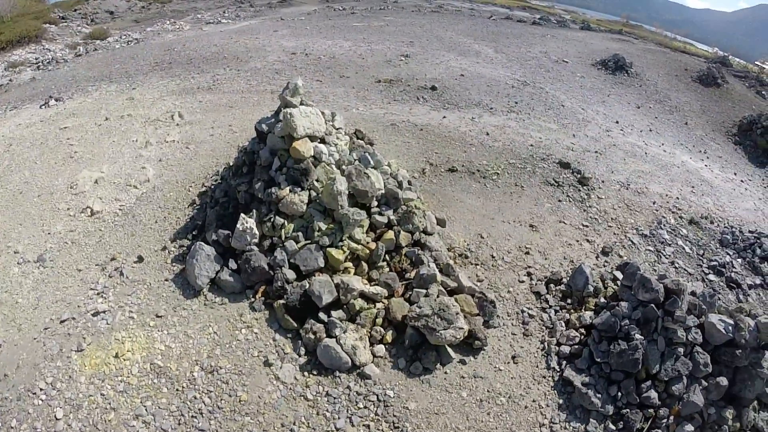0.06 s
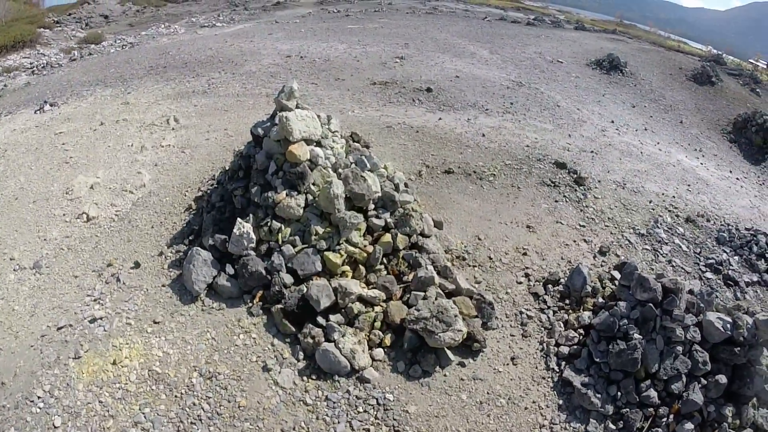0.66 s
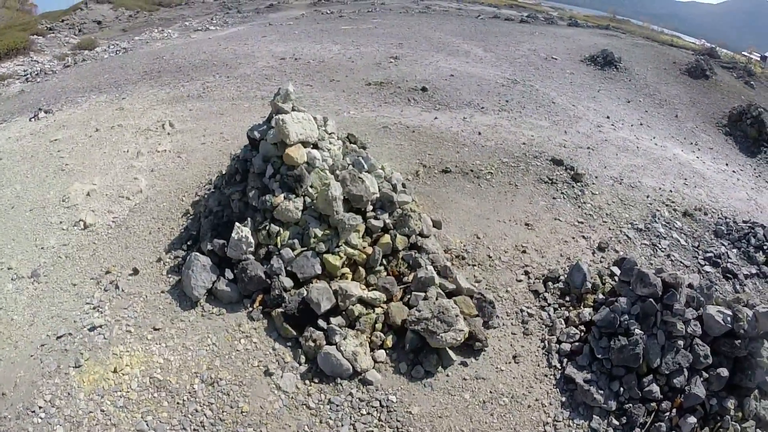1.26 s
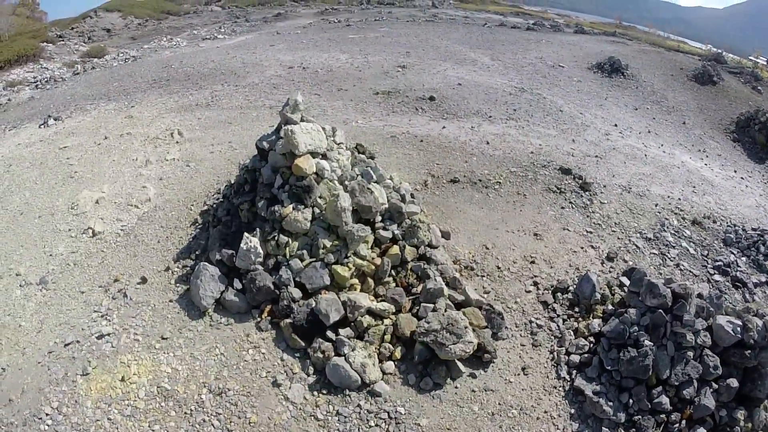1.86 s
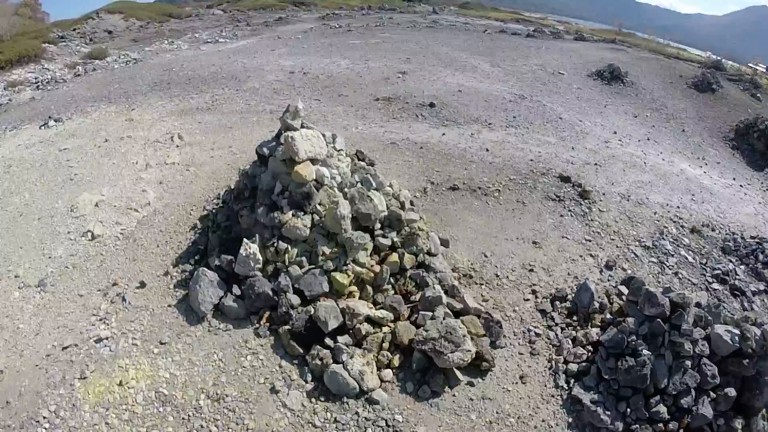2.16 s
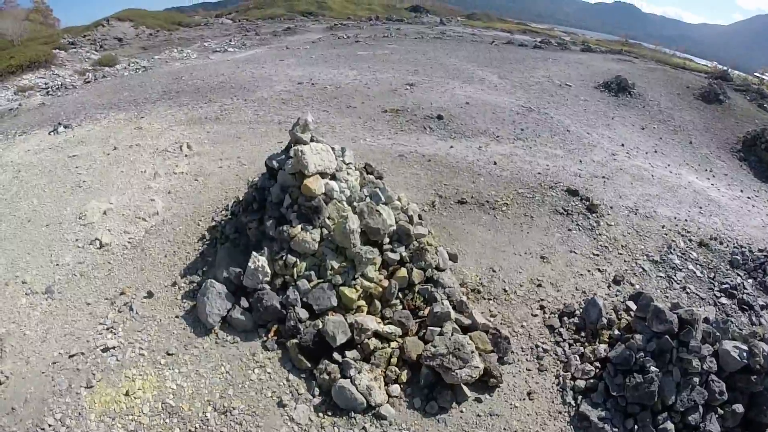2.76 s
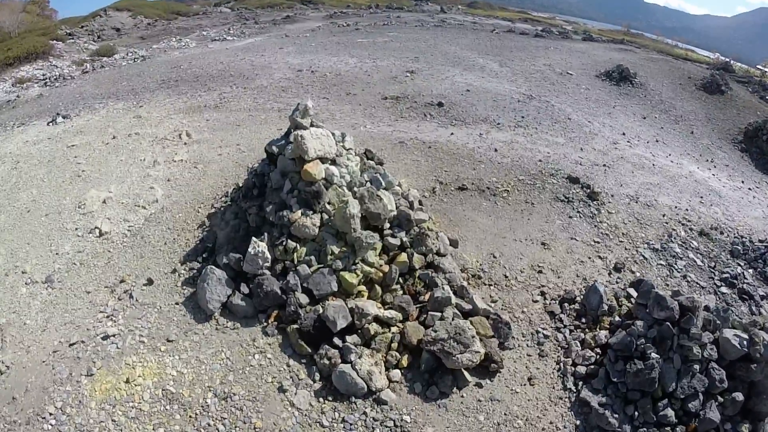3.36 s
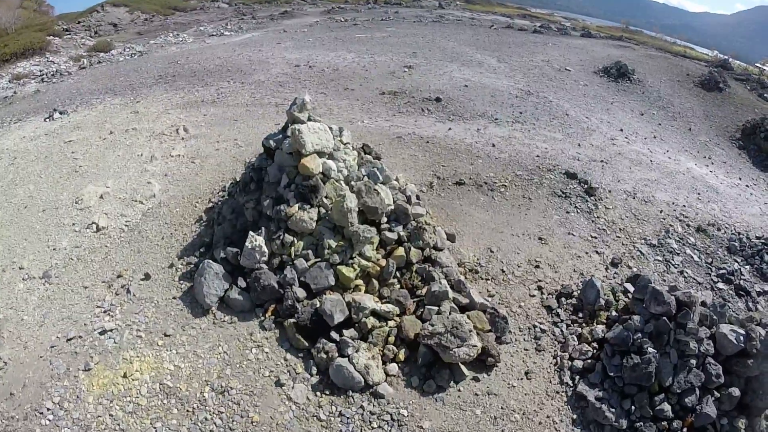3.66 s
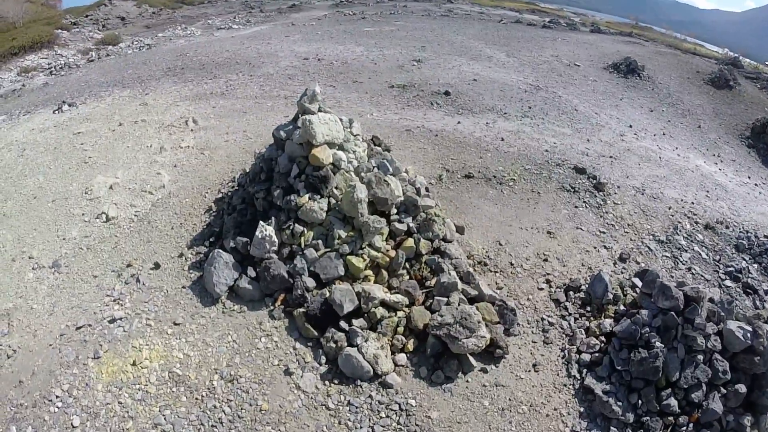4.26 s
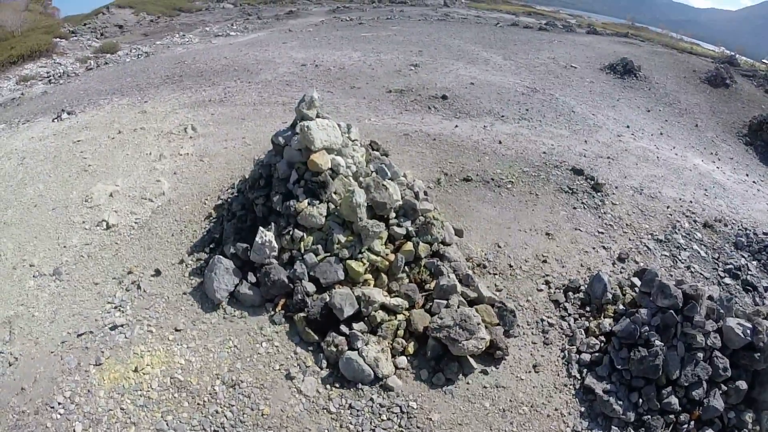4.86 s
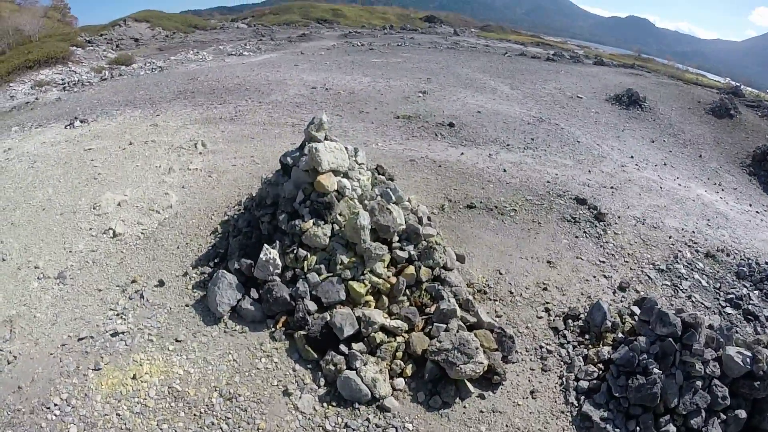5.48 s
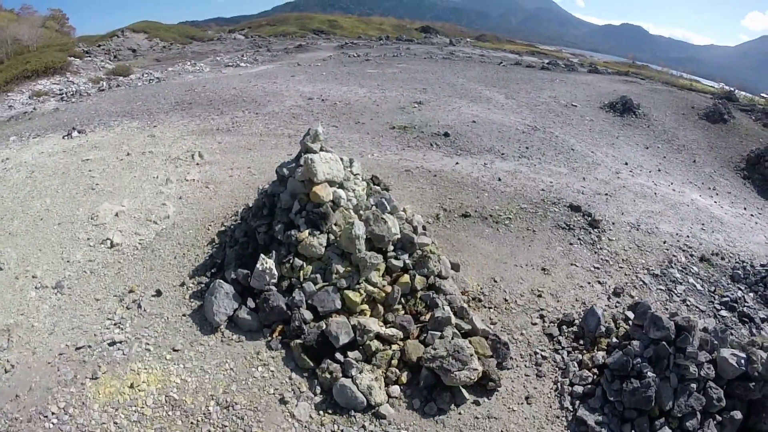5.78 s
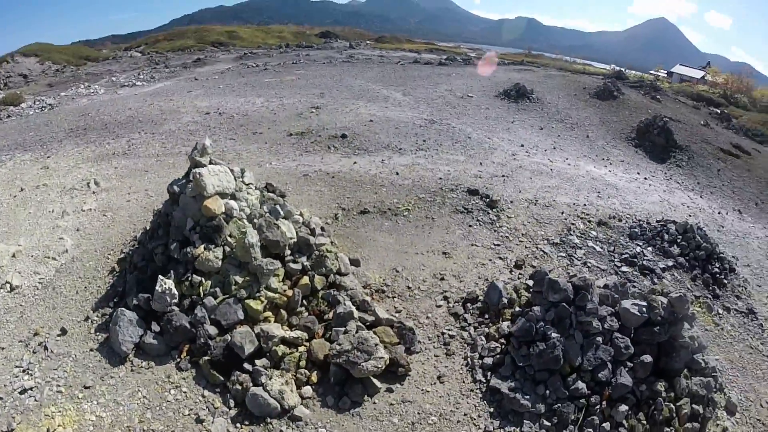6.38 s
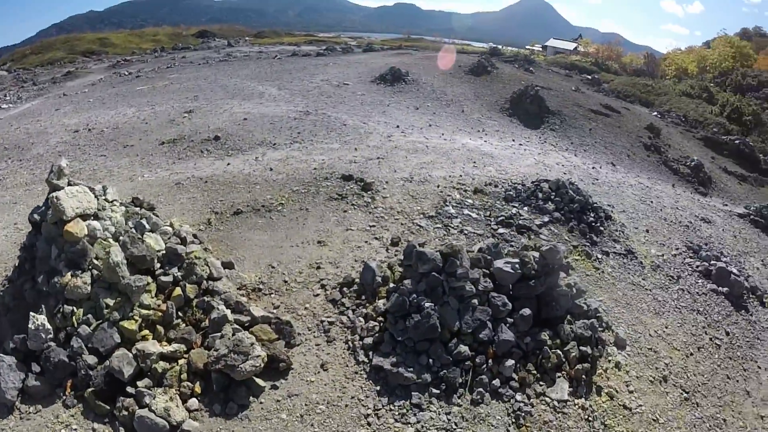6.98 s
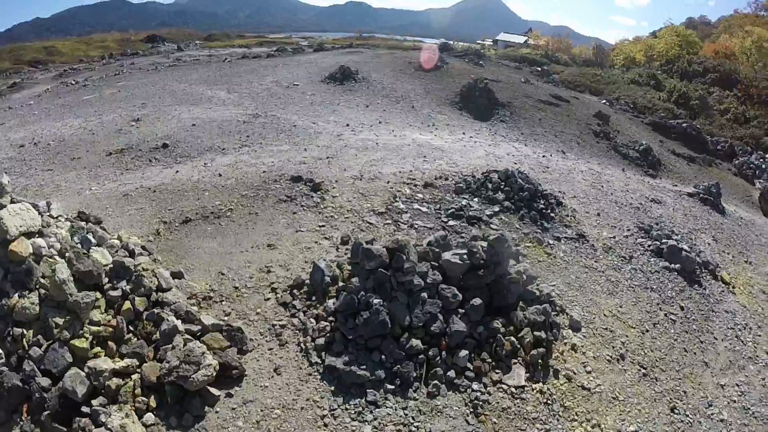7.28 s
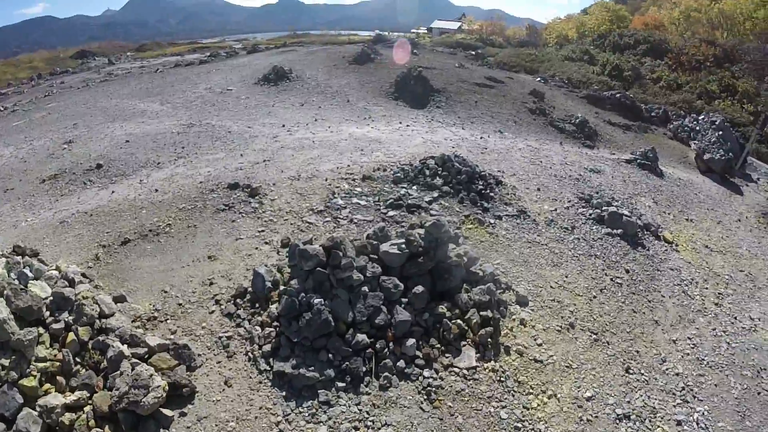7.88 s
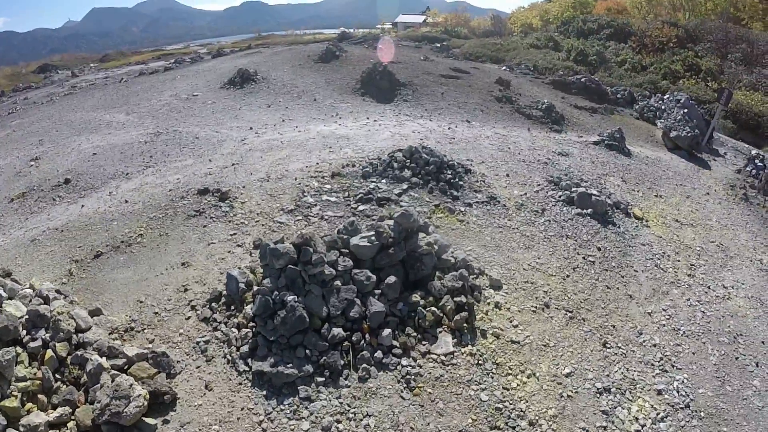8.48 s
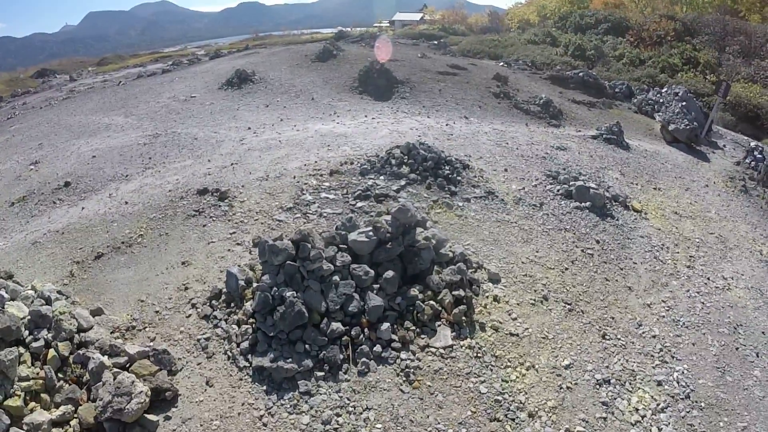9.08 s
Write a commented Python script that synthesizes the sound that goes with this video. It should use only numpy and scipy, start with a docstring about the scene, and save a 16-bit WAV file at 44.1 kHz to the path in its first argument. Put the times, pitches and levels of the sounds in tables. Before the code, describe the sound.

Small, uneven bubbling pips and a fine simmer come from rock heaps, with soft hiss, low wind gusts and a single handling knock.

```python
"""On a bare slope, volcanic gas bubbles up through water under two heaps of stones.
Each bubble's film tears with a short pip that reflects between the stones, and its open cavity
rings on. Beneath the pips lie a fine simmer and a steady hiss. Gusts buffet a hand-held camera,
whose case is rubbed, bumped a few times and knocked once."""
import sys
import numpy as np
from scipy import signal
from scipy.fft import rfft, irfft
from scipy.io import wavfile
from scipy.ndimage import uniform_filter1d

SR = 44100
rng = np.random.default_rng(int(sys.argv[2]) if len(sys.argv) > 2 else 0)


def persist_wave(psi):
    """Save psi, clipped to +-1, as 16-bit WAV."""
    counts = np.round(np.clip(psi, -1, 1) * 32767).astype(np.int16)
    wavfile.write(sys.argv[1], SR, np.atleast_2d(counts).T)


N = 407484
TIME = np.arange(N) / SR

# the loudest bubble bursts: t/s, level/dB, f/Hz, after-ring level/dB
LOUD_BURSTS = [(0.023, -38, 1920, -54.0), (0.085, -39, 2520, -50), (0.139, -47, 1940, -52),
               (0.245, -45, 1950, -58.0), (0.299, -41, 1760, -55.0), (0.338, -37.5, 1920, -48),
               (0.404, -48, 3120, -64), (0.497, -46, 2400, -62), (0.507, -50, 1820, -59.0),
               (0.543, -37, 1660, -49.0), (0.545, -41, 2850, -43), (0.551, -41, 3050, -48),
               (0.607, -50, 1670, -51), (0.711, -37.5, 1930, -56), (0.729, -45.0, 1580, -59),
               (0.95, -37.5, 1940, -50.0), (1.065, -45.0, 1790, -51), (1.111, -36, 1890, -50),
               (1.152, -35.5, 1920, -43), (1.253, -38.5, 730, -38), (1.276, -46, 1510, -55.0),
               (1.376, -52, 1050, -63), (1.446, -39, 1650, -53), (1.529, -41, 1780, -63.0),
               (1.545, -43.0, 1810, -51), (1.559, -51.0, 1260, -57.0), (1.627, -41.5, 1390, -54),
               (1.688, -45, 1440, -54), (1.764, -34, 1810, -45), (1.801, -39.5, 1860, -54.0),
               (1.858, -49, 1740, -62.0), (1.899, -44, 1780, -54), (2.134, -50, 1180, -55.0),
               (2.354, -49, 1290, -54), (2.464, -39, 1720, -49), (2.469, -38.5, 2900, -59),
               (2.612, -42, 1750, -59.0), (2.688, -42, 2420, -50), (2.727, -44, 1850, -55.0),
               (2.775, -43, 1440, -66), (2.822, -41, 1880, -52.0), (2.837, -40, 1700, -55.0),
               (2.908, -39.5, 1920, -50), (3.01, -41, 1690, -49), (3.335, -43, 1560, -55),
               (3.45, -37.0, 1790, -46.0), (3.481, -36.0, 1680, -58), (3.575, -41, 1750, -51),
               (3.634, -36.5, 1900, -50.0), (3.635, -42, 5050, -67.0), (3.678, -39.5, 1880, -47),
               (3.796, -51.5, 1840, -55), (3.831, -43, 1930, -56.0), (3.915, -36.5, 1800, -52),
               (3.922, -44, 3320, -58.0), (3.955, -39.5, 1520, -50), (3.991, -46, 1780, -57.0),
               (4.083, -39.5, 1830, -46), (4.168, -44, 1840, -58.0), (4.247, -42, 1840, -58.0),
               (4.324, -40, 2150, -61.0), (4.417, -43.0, 1740, -63.0), (4.439, -35, 1910, -43),
               (4.452, -49, 3220, -62), (4.463, -47, 1500, -53), (4.569, -49.5, 1370, -61.0),
               (4.585, -43, 2900, -64), (4.618, -46, 1740, -59.0), (4.658, -45, 1680, -63.0),
               (4.695, -45, 2000, -62.0), (4.742, -40.5, 1950, -53.0), (4.798, -53, 1250, -56),
               (4.851, -40.5, 1860, -54), (4.883, -46, 2300, -62), (5.018, -45, 1840, -51),
               (5.089, -47, 1750, -60), (5.104, -45, 1810, -49), (5.211, -44.0, 1740, -51.0),
               (5.333, -50, 1850, -48), (5.504, -45, 1550, -65), (5.612, -50, 1790, -51),
               (5.636, -45.0, 1540, -58), (5.815, -48, 1510, -55.0), (6.283, -46, 1220, -50),
               (6.341, -41.5, 1880, -42), (6.484, -54, 1220, -59.0), (6.575, -44.0, 2150, -50),
               (6.642, -43, 2170, -51), (6.699, -39.5, 1950, -47), (6.806, -53.5, 1210, -62.0),
               (6.837, -38, 2100, -54.0), (6.892, -43, 1900, -56.0), (6.956, -41, 2580, -65),
               (7.045, -47, 2440, -60), (7.173, -40, 1900, -63), (7.259, -35.5, 2440, -54),
               (7.261, -38, 4490, -65.0), (7.398, -42, 1910, -67), (7.503, -45, 2400, -63.0),
               (8.014, -52.5, 1260, -63.0), (8.081, -54.0, 1030, -52), (8.152, -40, 2530, -54),
               (8.298, -52.5, 1220, -56.0), (8.391, -45, 1200, -55), (8.402, -50, 1640, -46),
               (8.447, -48.0, 1410, -56), (8.512, -45.0, 2530, -61), (8.563, -52.0, 1640, -50),
               (8.663, -49, 1660, -51), (8.676, -44, 2420, -49.5), (8.8, -51, 1450, -57),
               (8.82, -44.0, 2490, -61.0), (8.951, -50, 1630, -60.0), (9.036, -46, 1760, -52)]
# spectrum of anything brushing the case: f/Hz, relative level/dB
BRUSH_SPECTRUM = [(150, 5), (480, -14.5), (640, 5.5), (1020, -9), (1270, 4), (1550, -3), (1750, 8.5),
                  (1930, -10), (2130, 5), (2500, -10.5), (2900, 1), (3180, -12), (3340, -3), (3900, -24),
                  (5700, -13.5), (9000, -41), (15000, -38)]
# normal modes of the case: f/Hz, relative level/dB, T60/s
CASE_MODES = [(635, -5, 0.12), (900, -1, .03), (1050, -10, .07), (1130, -10, .11), (1450, -8, 0.11),
              (1510, -4, .11), (1640, -2, 0.1), (1710, -2, 0.13), (1809, 13, .03), (1888, 4, 0.12),
              (2040, -6, .04), (2140, -9, .1), (2294, 4.5, 0.075), (2340, 9.5, .063), (2493, 4.5, .069),
              (2707, -1.5, .15), (2830, 3, 0.031), (3073, -5.5, 0.098), (3200, -9.5, .031),
              (3380, -13, .08), (3625, -10, 0.1), (3775, -12, 0.14), (4360, -7.5, .1), (4365, 3, 0.048),
              (4554, -10, 0.079), (5760, -18, .13), (5900, -24, 0.13), (6270, -27, 0.12),
              (7200, -16, 0.094), (7260, -16, .07), (10600, -29, .1)]


def undb(db):
    """Amplitude ratio of a level in decibels."""
    return 10 ** (np.asarray(db) / 20)


def unit(x):
    """Normalisation to rms 1."""
    return x / np.sqrt(np.mean(x ** 2))


def add(out, s, x):
    """Superposition: x joins out from second s on."""
    i = int(s * SR)
    x = x[max(-i, 0):max(N - i, 0)]
    out[max(i, 0):max(i, 0) + len(x)] += x


def colour(x, points):
    """Minimum-phase filtering by a response given as f/Hz, gain/dB."""
    size = 4096
    hz, db = np.transpose(points)
    bin_hz = np.arange(size // 2 + 1) * SR / size
    gain = undb(np.interp(np.log(bin_hz + 1), np.log(hz), db))
    cepstrum = irfft(np.log(gain))
    cepstrum[1:size // 2] *= 2  # folding the cepstrum makes the filter causal
    cepstrum[size // 2 + 1:] = 0
    return signal.fftconvolve(x, irfft(np.exp(rfft(cepstrum))))[:len(x)]


def noise(spectrum):
    """Spectrally shaped Gaussian noise of rms 1."""
    return unit(colour(rng.standard_normal(N), spectrum))


def waver(per_s):
    """Random modulation: straight ramps between random values, with a spread near 1."""
    hold = int(SR / per_s)
    steps = np.repeat(rng.standard_normal(N // hold + 1), hold)
    return np.sqrt(1.5) * uniform_filter1d(steps, hold)[:N]


def bell(sigma_s):
    """Gaussian envelope centred in one second."""
    return np.exp(-.5 * (np.arange(SR) / SR - .5) ** 2 / sigma_s ** 2)


def modes(rows, damping=1):
    """Impulse response as a sum of damped normal modes of alternating sign."""
    t = np.arange(SR // 3) / SR
    return sum((-1) ** k * undb(db - 60 * damping * t / t60) * np.sin(2 * np.pi * hz * t)
               for k, (hz, db, t60) in enumerate(rows))


def air(level_db=-53, waver_db=0.42):
    """Broadband noise: the hiss of gas and the low murmur of open air, wavering slightly."""
    # spectrum of hiss and murmur: f/Hz, relative level/dB
    spectrum = [(12, -2.5), (25, 3.5), (55, -1.5), (110, -5), (250, -10), (600, -14.5), (940, -17),
                (1300, -19.5), (1700, -20), (2250, -24.5), (3350, -26.5), (3900, -27.5), (11700, -41),
                (15000, -49)]
    return noise(spectrum) * undb(level_db + waver_db * waver(6))


def wind(buffet_db=-.5, rush_db=-22.5, flutter_db=2, eddy_db=3.0, lowest_hz=20):
    """Turbulence: each gust's eddies press on the microphone and rush over the case in proportion."""
    # gusts: t/s, Gaussian width/s, level/dB, upper edge of the eddies f/Hz
    gusts = [(0.476, 0.028, -45, 60), (0.834, 0.049, -43, 110), (1.151, 0.032, -44.5, 106),
             (1.227, 0.043, -48.5, 90), (1.622, 0.016, -45.5, 49), (3.05, 0.098, -54, 45),
             (3.461, 0.021, -39.5, 44.7), (4.123, 0.0073, -48.5, 90), (5.264, 0.039, -38, 52),
             (5.416, 0.035, -44, 116), (5.74, 0.008, -44.5, 117), (5.979, 0.051, -38, 107),
             (6.202, 0.0093, -38.5, 70), (6.304, 0.018, -36.5, 121), (6.372, 0.017, -36, 55),
             (6.47, 0.074, -46, 59), (6.744, 0.027, -43.5, 56), (7.413, 0.063, -48, 49.5),
             (7.901, 0.017, -47, 150), (8.015, 0.022, -39.5, 71), (8.463, 0.023, -38.5, 52.6),
             (8.72, 0.034, -45.5, 85)]
    buffet, rush = np.zeros(N), np.zeros(N)
    for s, width, db, edge_hz in gusts:
        swell = bell(width)
        band = signal.butter(2, [lowest_hz, max(edge_hz, 2 * lowest_hz)], "band", fs=SR, output="sos")
        eddies = signal.sosfilt(band, rng.standard_normal(SR))
        eddies /= np.sqrt(np.average(eddies ** 2, weights=swell ** 2))  # rms 1 within the gust
        add(buffet, s - .5, undb(db + buffet_db) * swell * eddies)
        add(rush, s - .5, undb(db + rush_db) * swell)
    buffet *= undb(eddy_db * waver(60))
    return buffet + rush * noise(BRUSH_SPECTRUM) * undb(flutter_db * waver(90))


def rubs(catches_per_s=900, grit_db=4, grip_damping=3, ring_db=-9):
    """Stick-slip friction: the grip's tiny catches make a gritty scuff and ring the hand-damped case."""
    # slips of the grip: t/s, Gaussian width/s, level/dB
    slips = [(.781, 0.0028, -48), (.797, 0.0049, -54), (0.821, 0.0091, -54), (0.848, 0.0076, -49),
             (0.862, 0.0089, -56), (0.919, 0.0056, -56), (1.231, 0.0067, -55.5), (1.253, .003, -54),
             (1.276, 0.01, -53), (5.988, 0.059, -53.5)]
    slip = np.zeros(N)
    for s, width, db in slips:
        add(slip, s - .5, undb(db) * bell(width))
    sizes = rng.choice([-1, 1], N) * undb(grit_db * np.clip(rng.standard_normal(N), -2, 2))
    catches = unit(sizes * (rng.random(N) < catches_per_s / SR))
    ring = modes(CASE_MODES, grip_damping)
    ringing = signal.fftconvolve(slip * catches, ring / np.linalg.norm(ring))[:N]
    return slip * unit(colour(catches, BRUSH_SPECTRUM)) + undb(ring_db) * ringing


def bumps():
    """A leak acts as a high-pass: the pressure pulse of a push on the case swings back as it escapes."""
    # pushes on the case: t/s, strength/dB, rise/s, fall/s, leak cutoff f/Hz
    pushes = [(0.541, 0, 0.0026, 0.002, 38), (.776, -22, 0.00073, 0.0069, 25),
              (5.221, -19, 0.0012, 0.0012, 30), (6.3883, -16.5, 0.00024, 0.018, 22),
              (6.416, -22, .002, .003, 30), (8.6685, -14, 0.0015, 0.0017, 30),
              (8.6971, -13, 0.0014, .0011, 30)]
    out, t = np.zeros(N), np.arange(SR // 5) / SR
    for s, db, rise, fall, leak_hz in pushes:
        pulse = undb(db) * (1 - np.exp(-t / rise)) ** 2 * np.exp(-t / fall)
        leak = signal.butter(2, leak_hz, "high", fs=SR, output="sos")
        add(out, s, signal.sosfilt(leak, pulse))
    return out


def knock(ring_db=-39.5, crack_db=-31, crack_t60=0.063):
    """Impact excitation: the body thuds once, and each chattering contact cracks and rings the case."""
    # the knock and its chatter: t/s, relative level/dB
    contacts = [(6.389, 2.5), (6.39089, -1.5), (6.3976, -4.5), (6.4, -7.5), (6.4083, -8.5)]
    # modes of the camera body: f/Hz, level/dB, T60/s
    body_modes = [(554, -17.5, .012), (755, -25, .022)]
    # spectrum of the crack: f/Hz, relative level/dB
    crack_spectrum = [(150, -11), (430, -19), (650, -22), (800, -7), (950, -2), (1300, -9), (1700, 1.5),
                      (2000, -1), (2600, -3.5), (3300, -11), (4000, -8.5), (4400, -6.5), (5200, -21),
                      (7100, -22.5), (8000, -29), (9500, -37), (10700, -28.5), (15000, -56)]
    out, ring = np.zeros(N), modes(CASE_MODES)
    t = np.arange(len(ring)) / SR
    add(out, contacts[0][0], modes(body_modes))
    for s, db in contacts:
        crack = unit(colour(rng.standard_normal(len(t)), crack_spectrum)) * undb(-60 * t / crack_t60)
        add(out, s, undb(db + ring_db) * ring + undb(db + crack_db) * crack)
    return out


def shower(flow, per_s, db, spread_db, hz, spread_octaves, swell_cycles, ring_db):
    """A random point process: bubbles of varied size burst unevenly, at levels that follow the gas flow."""
    count = 800
    late, size, pitch, tear = np.clip(rng.standard_normal((count, 4)).T, -2, 2)
    times = (np.arange(count) + late) / per_s
    levels = db + spread_db * size + np.interp(times, *np.transpose(flow))
    pitches = hz * 2 ** (spread_octaves * pitch)
    swells = swell_cycles * 2 ** (0.22 * tear)
    rows = np.transpose([times, levels, pitches, swells, levels + ring_db])
    return rows[(times > 0) & (times < N / SR)]


def splutter(soonest_s=0.00197, latest_s=.008, drop_db=-16, spread_db=3, octaves=.6, swell_cycles=0.41):
    """Daughter bubbles: each loud burst leaves a smaller, higher one that bursts a moment later."""
    rows = []
    for s, db, hz, ring_db in LOUD_BURSTS:
        late, size, small = rng.random(3)
        time = s + soonest_s + late * (latest_s - soonest_s)
        level = db + drop_db + spread_db * (2 * size - 1)
        rows.append((time, level, hz * 2 ** (octaves * small), swell_cycles, ring_db + drop_db))
    return rows


def pops(swell_cycles=0.44, ref_db=-41.5, doubling_db=24, ref_hz=1700, roundness=0.6):
    """Rise time sets timbre: strong bursts tear fast and crack; weak or big, low ones sound rounder."""
    rows = []
    for s, db, hz, ring_db in LOUD_BURSTS:
        swell = swell_cycles * 2 ** ((ref_db - db) / doubling_db) * (ref_hz / hz) ** roundness
        rows.append((s, db, hz, swell, ring_db))
    return rows


def bursts(rows, glide_octaves=0.37, snap_db=-22, rebound_s=0.00255, rebound_db=-5,
           scatter_db=-9, scatter_t60=0.084, ring_swell_s=0.0022, ring_glide_per_s=12):
    """Cavity resonance: a film tears with a rising tick that the stones reflect; the cavity rings on."""
    out, t = np.zeros(N), np.arange(SR // 20) / SR
    tick_t = t[:SR // 100]
    scatter = undb(-60 * t / scatter_t60) * (t > .002)
    scatter *= undb(scatter_db) / np.linalg.norm(scatter)
    ring_shape = (t / ring_swell_s) ** 2 * np.exp(2 - 2 * t / ring_swell_s)
    for s, db, hz, swell_cycles, ring_db in rows:
        age = tick_t * hz / swell_cycles
        rising_hz = hz * 2 ** (glide_octaves * np.tanh((age - 2.2) / 2))
        phase = 2 * np.pi * (np.cumsum(rising_hz) / SR + rng.random())
        shape = (age / 2) ** 2 * np.exp(2 - age)
        snap = undb(snap_db) / swell_cycles * rng.standard_normal(len(age))  # a fast tear snaps harder
        tick = undb(db) * shape * (np.sin(phase) + snap)
        paths = scatter * rng.standard_normal(len(t))  # each tick takes its own ways out of the heap
        paths[0] += 1  # direct sound
        rebound = int(rebound_s * rng.uniform(.65, 1.35) * SR)
        paths[rebound] += undb(rebound_db) * rng.choice([-1, 1])
        add(out, s - swell_cycles / hz, signal.fftconvolve(tick, paths))
        ring_cycles = np.cumsum(hz * (1 + ring_glide_per_s * (t - ring_swell_s))) / SR
        add(out, s, undb(ring_db) * ring_shape * np.sin(2 * np.pi * (ring_cycles + rng.random())))
    return out


def vent():
    """Path filtering: pops, plops and fizz change colour as the camera turns from heap to heap."""
    # liveliness of the soft plops: t/s, relative level/dB
    plop_flow = [(0, -3), (1.5, 6.5), (3.2, 1.5), (4.6, 3), (5.5, 2.5), (6.3, -9), (7.7, -0.5), (8.4, -2),
                 (9.24, 6)]
    # liveliness of the small bubbles: t/s, relative level/dB
    fizz_flow = [(0, 4), (1.5, 1.5), (2.2, 2.5), (3.4, 3.5), (4.8, 1), (5.7, 4.5), (6.6, 2.5), (7.7, 0),
                 (8.5, 1), (9.24, 2)]
    # response facing the tall pale heap: f/Hz, gain/dB
    pale_heap = [(400, -27), (950, -4.5), (1200, 4.5), (1780, 3.5), (1930, -7), (2140, 0.5), (2330, -5),
                 (2620, 5), (2900, -1.5), (3480, 1.5), (3800, -11), (5100, 4.5), (11000, -36)]
    # response facing the low dark heap: f/Hz, gain/dB
    dark_heap = [(400, -25), (950, -1.5), (1200, 7.5), (1680, -1.5), (1810, -3), (2020, 2.5), (2280, -5.5),
                 (2480, 5.5), (2940, -10.5), (3280, 5.5), (3950, -9), (5100, -1), (11000, -49)]
    # the camera's turn: t/s, share of the dark heap (0-1)
    turn = [(0, 0.28), (6.0, 0.14), (6.8, 0.98), (9.24, 1)]
    plops = shower(plop_flow, per_s=12, db=-56, spread_db=2,
                   hz=1518, spread_octaves=0.1, swell_cycles=0.6, ring_db=-13)
    fizz = shower(fizz_flow, per_s=55, db=-53, spread_db=2.5,
                  hz=2050, spread_octaves=0.42, swell_cycles=0.38, ring_db=-19)
    bubbling = bursts(pops()) + bursts(splutter()) + bursts(plops) + bursts(fizz)
    turned = np.interp(TIME, *np.transpose(turn))
    return (1 - turned) * colour(bubbling, pale_heap) + turned * colour(bubbling, dark_heap)


def scene():
    """Superposition of the air, the noises on the camera and the vent, in mono."""
    return (air() + wind() + rubs() + bumps() + knock() + vent())[None]


def record(dry):
    """Band limiting: the camera's steep low-pass cuts the highest treble."""
    cutoff_hz = 15100
    return signal.sosfilt(signal.ellip(10, .2, 70, cutoff_hz, fs=SR, output="sos"), dry)


dry = scene()
out = record(dry)
persist_wave(out)
```